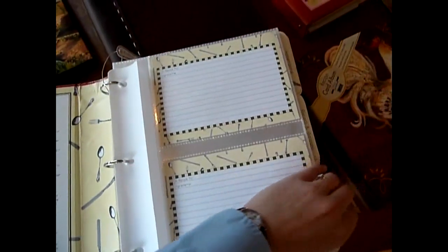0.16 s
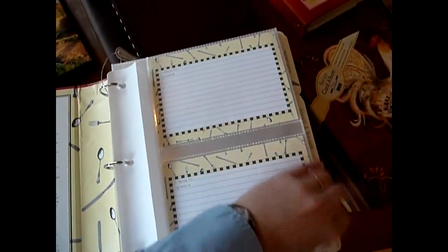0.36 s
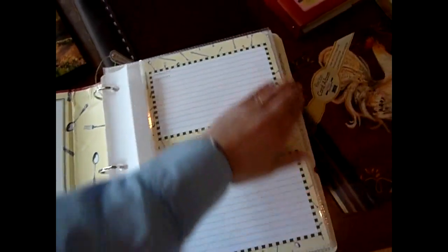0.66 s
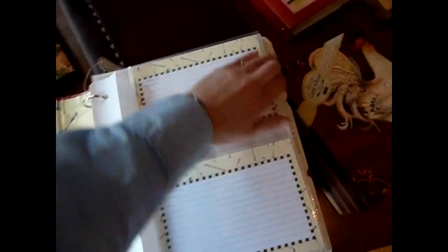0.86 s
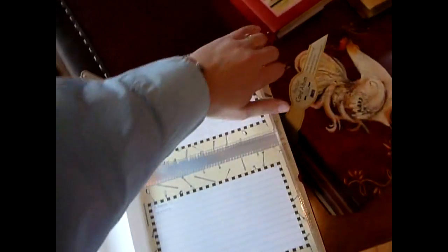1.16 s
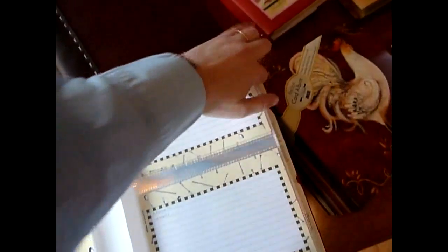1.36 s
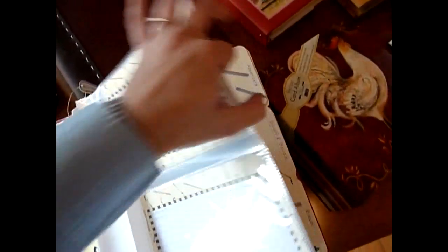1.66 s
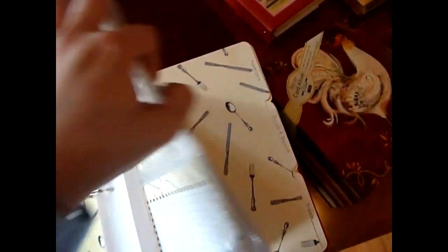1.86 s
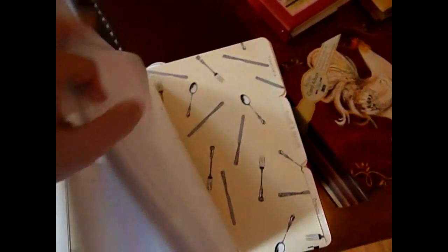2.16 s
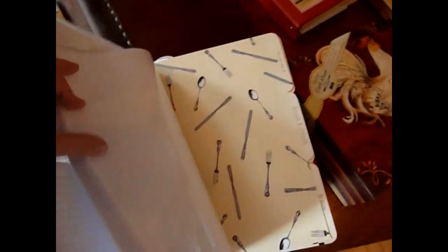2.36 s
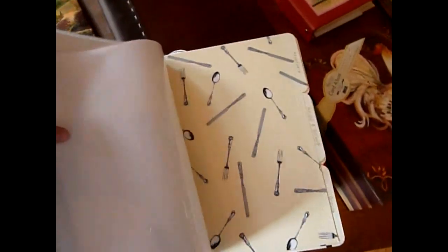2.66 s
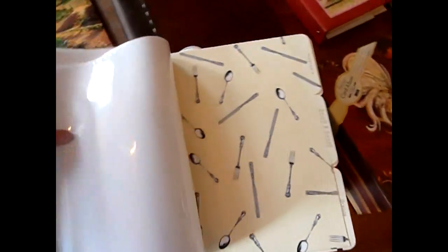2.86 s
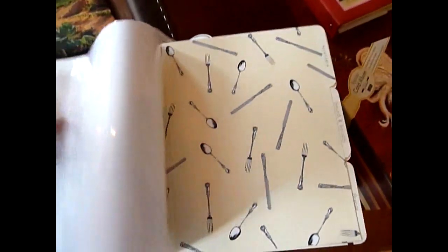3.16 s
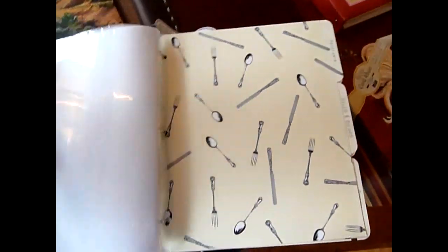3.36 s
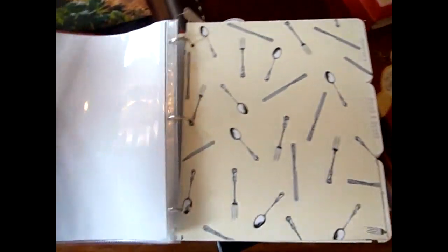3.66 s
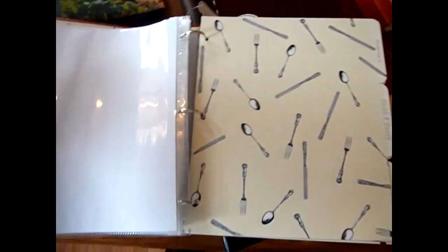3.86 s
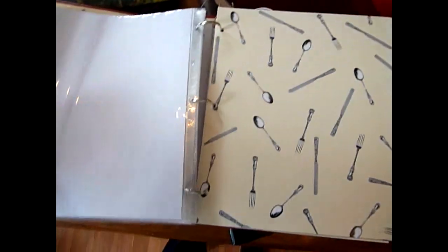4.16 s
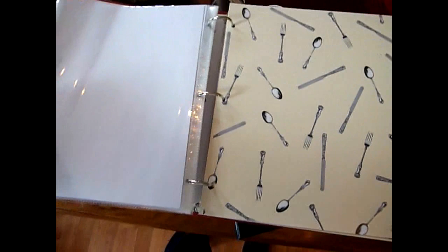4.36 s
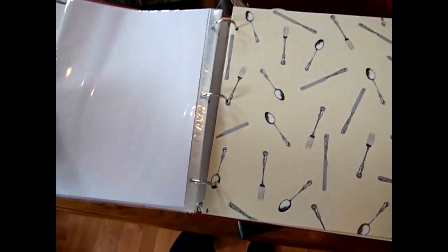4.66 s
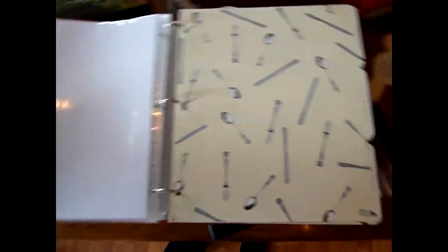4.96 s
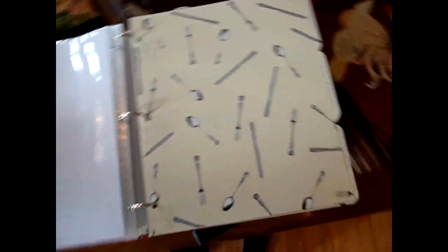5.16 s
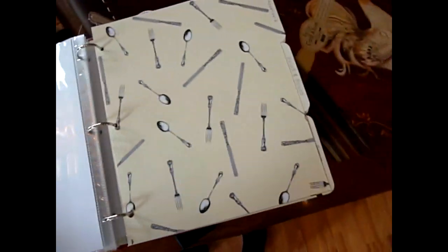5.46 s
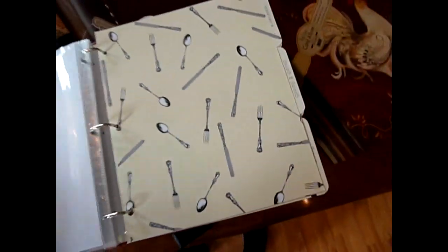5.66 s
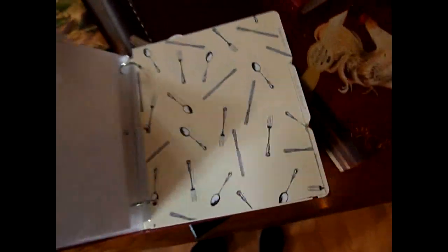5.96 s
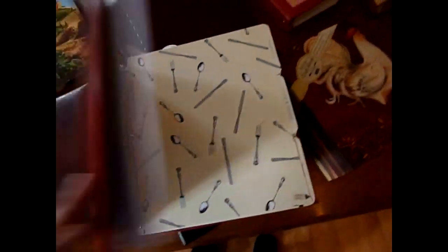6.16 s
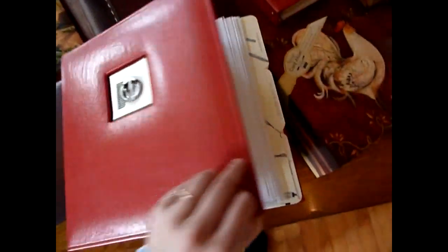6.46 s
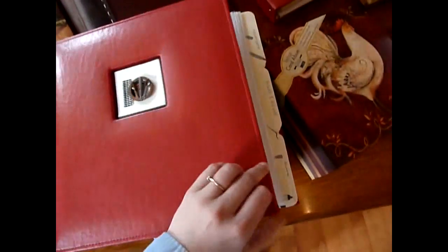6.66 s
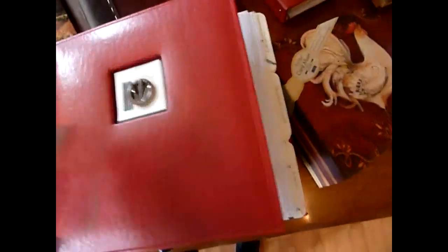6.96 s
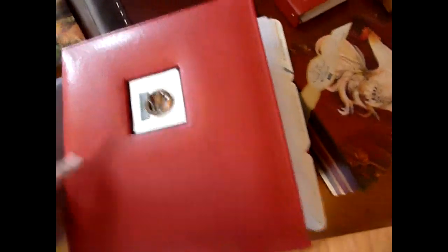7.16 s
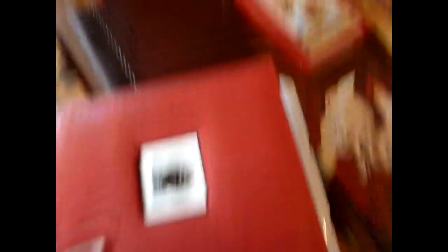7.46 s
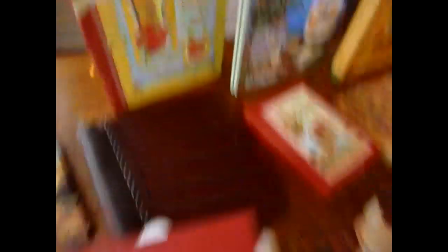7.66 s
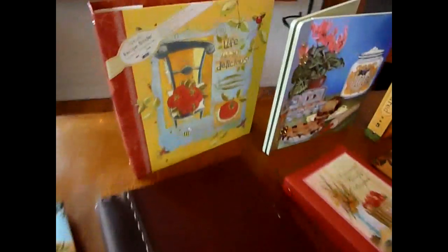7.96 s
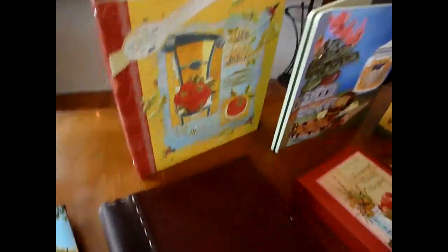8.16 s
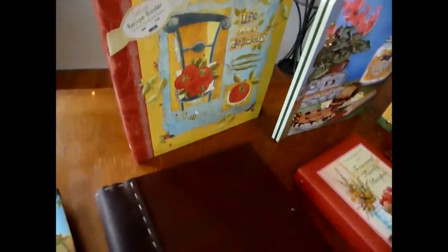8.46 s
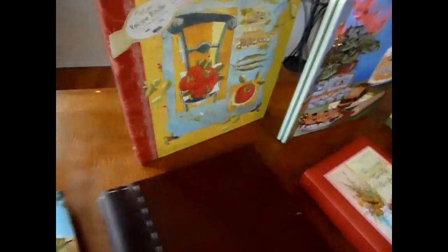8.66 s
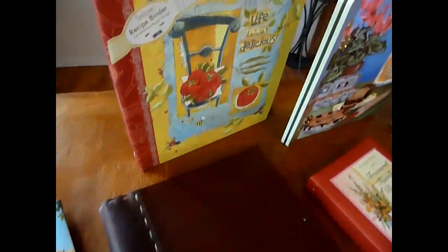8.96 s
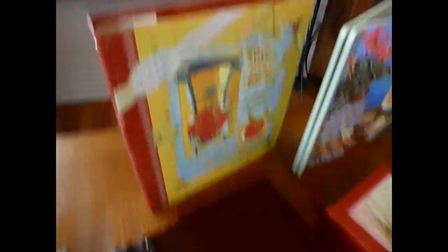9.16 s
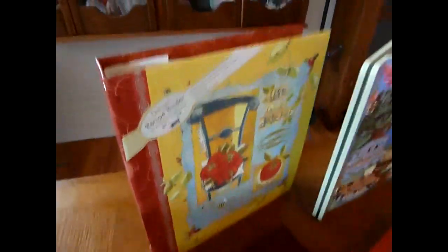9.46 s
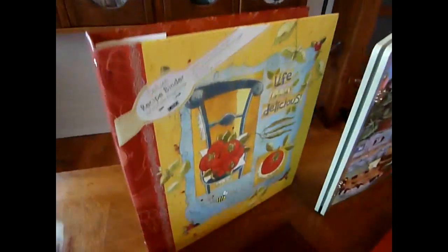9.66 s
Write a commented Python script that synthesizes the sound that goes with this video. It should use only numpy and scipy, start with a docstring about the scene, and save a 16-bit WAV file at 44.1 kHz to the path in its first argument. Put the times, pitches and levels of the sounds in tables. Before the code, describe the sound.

Close to the microphone in a small quiet room, plastic page protectors slide and crinkle faintly, with dry little clicks. Flops and knocks grow stronger as pages turn over, then comes a quieter pause. A sharp snap precedes the padded cover thudding shut and a hand stroking it. Damped bumps, short rubs and one fast brush on the wooden table follow, fading into soft room hush.

```python
"""Leafing through a binder of plastic sleeves

A ring binder of page protectors on a wooden table, one microphone close by, in a small room.
Sleeves slide, crinkle and flop: coloured friction noise, with clicks where the plastic buckles.
The padded cover is swung shut and stroked, then things are bumped and brushed about the table:
damped thuds, booms and cracks, a few ringing modes, and rubbing noise that drums at a moving pitch.
Diffuse reflections and a soft rush of still air lie behind it all."""
import sys
import numpy as np
from scipy import signal
from scipy.fft import rfft, irfft, next_fast_len
from scipy.io import wavfile

SR = 44100
rng = np.random.default_rng(int(sys.argv[2]) if len(sys.argv) > 2 else 0)


def master(y):
    """Save y as 16-bit WAV."""
    cut = np.clip(np.atleast_2d(y).T, -1, 1)
    pcm = np.round(cut * 32767)  # scale
    wavfile.write(sys.argv[1], SR, pcm.astype(np.int16))


N = 432621
TIME = np.arange(N) / SR   # s
HIT_TIME = np.arange(SR // 16) / SR   # s
CUTOFF_HZ = 7500

# A sleeve is pushed or dragged over its neighbour:
# start_s, length_s, level_db (of the crinkle), brightness_db
SLIDES = [(0.245, 0.063, -63.5, 5), (0.458, 0.015, -54.5, 1.5), (0.52, 0.16, -65, -2),
          (0.635, 0.019, -58, 2), (0.665, 0.17, -59.5, -1), (1.19, 0.21, -61.5, 5), (1.49, .14, -64.5, -2),
          (1.68, 0.098, -62, -3), (1.84, 0.056, -60.5, -1), (2.025, 0.051, -58, -3),
          (2.125, 0.078, -57.5, 2.5), (2.245, 0.062, -51, 2), (2.47, 0.29, -57.5, 0),
          (2.655, 0.064, -47, -2), (2.755, 0.058, -46, -8), (2.82, 0.09, -53.5, -10), (2.9, .035, -43, 1),
          (3.125, 0.046, -53.5, -3), (3.23, 0.1, -57, -1.5), (3.335, .18, -46.5, 0),
          (3.735, 0.089, -55.5, -7.5), (4.128, 0.017, -55, -4.5), (4.3, 0.075, -66.5, -1),
          (4.84, 0.077, -70, 1), (5.15, 1, -72.5, -1), (5.87, 0.16, -58, -4.5), (6.17, 0.054, -60, -3),
          (6.278, 0.042, -43.5, -4), (6.37, 0.14, -58.5, -2)]
SLIDE_SWELL, SLIDE_T60 = 0.24, 0.34   # share of the length spent swelling; dying away, s
# A sleeve drops and settles: start_s, level_db (of the crinkle), brightness_db
FLOPS = [(2.93, -33, -1.5), (3.565, -43, -6.5), (4.24, -62.5, 11), (5.07, -57.5, -6.5), (6.062, -46.5, 1),
         (6.322, -53, 7)]
FLOP_LENGTH_S, FLOP_SWELL, FLOP_T60 = 0.0089, 0.75, 0.41   # s, share of the length, s
FLEX_DB, SLEEVE_HISS_DB = -5.5, -4.5   # beside the crinkle, at brightness 0
# Colours of the bending sheet, its crinkle and its hiss: pitch_hz, density_db (per Hz, relative)
FLEX_COLOUR = [(100, -13.5), (190, -7.5), (255, -1.5), (400, 7), (550, 5.5), (680, 3.5), (810, 3),
               (1100, -23.5), (1800, -37)]
CRINKLE_COLOUR = [(600, -4.5), (900, 1.5), (1130, 4.5), (1400, 3.5), (1850, 2.5), (2250, 0.5), (2700, -2),
                  (3400, -11.5), (4200, -28)]
SLEEVE_HISS_COLOUR = [(2200, -18), (3300, 2.5), (4300, 0.5), (5300, -0.5), (6500, -6.5), (7500, -20.5)]

# Plastic buckles or catches on the rings: start_s, level_db (of the click), centre_hz
SNAPS = [(0.4768, -52, 2300), (1.0268, -48.5, 3360), (1.297, -57, 4000), (1.343, -50, 2500),
         (1.4782, -50.5, 2860), (1.49, -52.5, 1500), (1.8593, -52, 2250), (1.8768, -45, 2900),
         (2.0327, -50.5, 3000), (2.064, -45.5, 2700), (2.1877, -44.5, 3320), (2.2491, -40, 3450),
         (2.2597, -49, 2240), (2.3268, -43, 1990), (2.5528, -43, 3600), (2.6328, -34, 1940),
         (2.698, -45, 1460), (2.8586, -45, 1690), (2.8981, -35, 2390), (3.1765, -45.5, 1960),
         (3.2288, -42, 1970), (3.256, -46, 2250), (4.1914, -45, 3430), (4.235, -45, 3570),
         (4.2399, -37, 3150), (4.312, -53, 2340), (4.358, -55, 3500), (4.436, -54, 2350),
         (4.539, -60, 2700), (4.8506, -52.5, 2410), (4.904, -54, 2400), (5.0686, -37.5, 1900),
         (6.0608, -25.5, 2230), (6.2086, -49, 1710), (6.2465, -43, 1610), (6.2761, -40, 1900),
         (6.2856, -35.5, 1950), (6.3244, -30, 2900), (7.506, -42, 1720), (7.684, -46.5, 3000),
         (7.726, -32, 1660), (7.8252, -39, 1600), (8.0026, -51, 4800), (9.0299, -37, 1840),
         (9.708, -52, 1380), (9.756, -52, 1730)]
SNAP_TOP_HZ = 5200   # highest upper band edge of any click

# Fingers cross the top page: time_s, level_db
GLIDE = [(.7, -74), (.88, -56.5), (1.1, -61.5), (1.18, -69)]
# Colour of the fingertips' hiss: pitch_hz, density_db (per Hz, relative)
GLIDE_COLOUR = [(3000, -5.5), (4200, 0.5), (5200, 2.5), (6500, -4.5), (7500, -15.5)]

# Pages, cover and books land on the table:
# start_s, thud_hz, thud_db, then boom_db, clack_db and crack_db, all three beside the thud
KNOCKS = [(2.6742, 410, -38, -9, 0.5, -15), (2.784, 275, -30, -15.5, -8, -17),
          (2.924, 546, -21, -21, -20, -4), (2.9268, 444, -30, -15.5, -2, -14),
          (2.9453, 560, -29.5, -26, -20, -0.5), (3.2373, 360, -31, -13, -21, -26),
          (3.5529, 600, -27.5, -19, -2, -7), (3.5635, 746, -19.5, -26, -5, -11.5),
          (3.569, 407, -24, -30, -6, -5.5), (3.576, 463, -31.5, -26, -17, -6),
          (3.801, 600, -44, -21, -1, -10), (3.8236, 603, -47, -13, 3, -13),
          (4.1328, 430, -42, -21, -1.5, -19), (6.315, 686, -31.5, -22.5, -8, -11),
          (6.403, 600, -43, -20, -16, -23), (6.4766, 395, -22.5, -23, -11.5, -13),
          (6.5095, 604, -32.5, -19, -14, -25), (7.411, 710, -35.5, -15, -16, -23),
          (7.7418, 414, -19, -13, -9.5, -21), (7.752, 487, -26, -9, -12, -12.5),
          (7.8203, 650, -27, -9, -14, -21), (7.9709, 423, -35, -30, -26, -24),
          (8.1999, 507, -29.5, -9.5, -20, -26), (8.2479, 723, -27, -24, -14, -25),
          (8.3894, 530, -18.5, -19.5, -13, -22), (8.3924, 422, -23, -29, -17, -23),
          (8.455, 460, -31.5, -17, -3.5, -22), (8.8027, 650, -41.5, -4.5, 2, -8.5),
          (8.8885, 420, -26.5, -15.5, -6, -19.5), (8.892, 448, -29.5, -17.5, -8, -30)]
# Boards and binder rings sound on after a blow: start_s, pitch_hz, starting_level_db, t60_s
RINGS = [(2.947, 808, -36, 0.37), (3.576, 404, -31, 0.18), (3.576, 682, -39, 0.32), (4.145, 400, -38, 0.18),
         (4.241, 4140, -53, 0.25), (8.397, 396, -23.5, 0.054)]

# A hand or cuff rubs briefly over a cover or the table:
# start_s, length_s, level_db (of the scrape), brightness_db, drumming_hz
RUBS = [(6.965, 0.077, -43.5, 5, 990), (7.09, 0.094, -65, 4, 800), (7.215, 0.11, -61.5, 4, 400),
        (7.337, 0.019, -53.5, -6, 636), (7.402, 0.014, -52, -3.5, 710), (7.468, 0.041, -53, -3, 640),
        (7.591, 0.043, -52, -4.5, 555), (7.66, 0.055, -47.5, 2, 470), (7.711, 0.054, -43, 0, 750),
        (7.79, 0.062, -46, -2, 680), (7.893, .045, -48, 0, 740), (7.984, 0.058, -53, -1, 480),
        (8.046, 0.14, -57, -7.5, 790), (8.128, 0.089, -49.5, -2, 900), (8.228, 0.039, -45, -1, 900),
        (8.292, 0.049, -54.5, -1, 630), (8.375, 0.052, -46, -1, 500), (8.454, 0.17, -48.5, -7, 1000),
        (8.666, 0.08, -57, 0.5, 920), (8.777, 0.069, -51.5, 0, 676), (8.874, 0.054, -49, -4.5, 820),
        (8.945, .1, -52.5, 0, 690), (9.12, 0.16, -59, 0, 446), (9.298, 0.4, -68.5, -3.5, 496),
        (9.704, 0.091, -61, 1, 553)]
RUB_SWELL, RUB_T60 = 0.37, .2   # share of the length spent swelling; dying away, s
DRUM_DB, RUB_HISS_DB = 2.5, -9.5   # beside the scrape, at brightness 0
# One long stroke over the closed cover, both levels before the trims below:
# time_s, drumming_db, scrape_db, drumming_hz
STROKE = [(6.49, -35, -46, 570), (6.554, -43.5, -55, 641), (6.61, -36.5, -45.5, 765),
          (6.658, -38, -44, 715), (6.686, -38, -43, 870), (6.848, -40, -42, 584), (6.918, -46.5, -42, 772),
          (6.96, -55, -51, 788)]
# Trims of the stroke; its hiss follows the untrimmed scrape
STROKE_DRUM_DB, STROKE_SCRAPE_DB, STROKE_HISS_DB = -1, -3.5, -12
# Colours of scraping and hissing under the hand: pitch_hz, density_db (per Hz, relative)
SCRAPE_COLOUR = [(600, -2), (1000, 3.5), (1300, 3), (1800, 1), (2350, 0), (2900, -3.5), (4200, -33)]
RUB_HISS_COLOUR = [(2200, -14.5), (3300, 8.5), (4000, 7), (5200, 0), (6500, -8.5), (7500, -24.5)]

# A quick brush over a cover: time_s, level_db
SWISH = [(8.5, -62), (8.545, -32), (8.6, -29), (8.64, -38), (8.71, -52)]
# Colour of the brush: pitch_hz, density_db (per Hz, relative)
SWISH_COLOUR = [(400, -3.5), (800, -7), (1000, -11), (1310, 1), (1800, -5.5), (2400, 0.5), (2850, -8.5),
                (3500, -8), (4700, -16.5), (6300, -25.5), (7500, -39)]

# Colour of the room's reflections: pitch_hz, level_db
ROOM_COLOUR = [(90, -11), (250, 5), (500, -3.5), (1000, -8.5), (2500, -0.5), (6000, -6.5)]
# Colour of the still room: pitch_hz, density_db (per Hz, relative)
AIR_COLOUR = [(25, -25), (50, -10), (80, -5.5), (135, 0.5), (190, 0.5), (330, 0.5), (450, -3.5), (650, -4),
              (1000, -9.5), (2000, -15.5), (3200, -18.5), (5000, -24), (6500, -30.5), (7500, -42)]
AIR_DB = -53.5


def pages():
    """As sleeves slide and flop, the same slips make the sheet flex, crinkle and hiss."""
    drops = [(s, FLOP_LENGTH_S, db, bright_db) for s, db, bright_db in FLOPS]
    sliding = gestures(SLIDES, SLIDE_SWELL, SLIDE_T60)
    flopping = gestures(drops, FLOP_SWELL, FLOP_T60)
    flex, crinkle, hiss = np.hypot(sliding, flopping)
    slips = friction(slips_per_s=650, spread_db=4.5, smooth=1.0, clump_db=2.5)
    flexing = from_db(FLEX_DB) * flex * coloured(slips, FLEX_COLOUR)
    crinkling = crinkle * coloured(slips, CRINKLE_COLOUR)
    hissing = from_db(SLEEVE_HISS_DB) * hiss * coloured(slips, SLEEVE_HISS_COLOUR)
    return flexing + crinkling + hissing


def snaps(width=2.18, chatter=0.36, t60=0.012, sheet_db=-8, board_db=-17, stiff_db=9, top=1.57):
    """A crease flips over: a dry click in one broad band, a softer flap of the sheet, a tap on the board."""
    out = np.zeros(N)
    for s, db, hz in SNAPS:
        push = contact(chatter, t60)
        resonance = band(push, hz / width, hz * width, order=1)
        click = band(resonance, hz / 3, min(hz * top, SNAP_TOP_HZ))
        add(out, s, at_level(click, db))
        # small, high creases move little of the sheet: stiff_db less per octave
        moved_db = db - stiff_db * np.log2(hz / 2000)
        add(out, s, at_level(band(push, 580, 1300), moved_db + sheet_db))
        add(out, s, at_level(band(push, 290, 680), moved_db + board_db))
    return out


def glide():
    """Fingertips skim the smooth plastic with a thin, airy hiss of very dense slips."""
    level, = gains(GLIDE)
    slips = friction(slips_per_s=13000, spread_db=5.5, smooth=1.4, clump_db=1.4)
    return level * coloured(slips, GLIDE_COLOUR)


def knocks(thud_t60=0.017, scatter=0.41):
    """A heavily damped board thuds, the table booms under it, hard edges clack and crack."""
    out, thuds = np.zeros(N), np.zeros(N)
    for s, hz, thud_db, boom_db, clack_db, crack_db in KNOCKS:
        board = np.sin(2 * np.pi * hz * HIT_TIME) * from_db(-60 * HIT_TIME / thud_t60)
        other_modes = band(contact(chatter=0.079, t60=0.097), 280, 850)
        thud = at_level(board, 0) + scatter * at_level(other_modes, 0)
        push = contact(chatter=0.17, t60=0.018)
        boom = band(contact(chatter=0.13, t60=0.12), 118, 197, order=3)
        add(thuds, s, at_level(thud, thud_db))
        add(out, s, at_level(boom, thud_db + boom_db))
        add(out, s, at_level(band(push, 1030, 1740, order=3), thud_db + clack_db))
        add(out, s, at_level(band(push, 1600, 4200, order=3), thud_db + crack_db))
    # a small board radiates little bass
    return out + band(thuds, 225, 1900)


def cover_puff(s=6.4765, level_db=-27, low_hz=65, high_hz=330):
    """The closing cover squeezes out one low push of air."""
    out = np.zeros(N)
    puff = band(contact(chatter=0.031, t60=0.012), low_hz, high_hz)
    add(out, s, at_level(puff, level_db))
    return out


def ringing():
    """Some blows leave modes sounding a little longer, each a decaying sine."""
    out, t = np.zeros(N), TIME[:SR // 2]
    for s, hz, db, t60 in RINGS:
        add(out, s, from_db(db - 60 * t / t60) * np.sin(2 * np.pi * hz * t))
    return out


def rubbing():
    """Skin and cloth catch and slip in one long stroke and many short rubs; the surface drums under them."""
    drum, scrape, hiss = gestures([row[:4] for row in RUBS], RUB_SWELL, RUB_T60)
    stroke_drum, stroke_scrape = gains([row[:3] for row in STROKE])
    drum = from_db(DRUM_DB) * drum + from_db(STROKE_DRUM_DB) * stroke_drum
    scrape = scrape + from_db(STROKE_SCRAPE_DB) * stroke_scrape
    hiss = from_db(RUB_HISS_DB) * hiss + from_db(STROKE_HISS_DB) * stroke_scrape
    # the drumming pitch moves through the stroke, then through the middle of each rub
    stroke_pitch = [(s, hz) for s, *_, hz in STROKE]
    rub_pitch = [(s + length / 2, hz) for s, length, *_, hz in RUBS]
    centre_hz = np.interp(TIME, *np.transpose(stroke_pitch + rub_pitch))
    slips = friction(slips_per_s=1600, spread_db=2.0, smooth=1.0, clump_db=1.55)
    drumming = drum * gliding_band(slips, centre_hz, octaves=1.0)
    scraping = scrape * coloured(slips, SCRAPE_COLOUR)
    return drumming + scraping + hiss * coloured(slips, RUB_HISS_COLOUR)


def swish():
    """One fast brush over a cover: sliding noise with a few stronger catches in it."""
    level, = gains(SWISH)
    slips = friction(slips_per_s=1900, spread_db=11.5, smooth=3.9, clump_db=-3.6)
    return level * coloured(slips, SWISH_COLOUR)


def room(x, t60, build_s=0.0037, treble_t60=0.51):
    """Diffuse reflections build up within milliseconds; each octave dies away at its own rate."""
    t, response = TIME[:SR // 2], 0
    for hz in 90 * 2. ** np.arange(7):
        noise = band(rng.standard_normal(len(t)), hz / np.sqrt(2), hz * np.sqrt(2))
        decay_s = np.interp(hz, [0, CUTOFF_HZ], [t60, treble_t60])
        tail = noise * from_db(-60 * t / decay_s) * (1 - np.exp(-(t / build_s) ** 2))
        # before its colour, each octave returns what it received
        share = np.sqrt(np.sqrt(2) * hz / SR / np.sum(tail ** 2))
        response = response + tail * share * from_db(at_hz(ROOM_COLOUR, hz))
    return signal.fftconvolve(x, response)[:N]


def still_air():
    """The room's own soft rush: steady noise, strongest in the lows."""
    return from_db(AIR_DB) * coloured(rng.standard_normal(N), AIR_COLOUR)


def friction(slips_per_s, spread_db, smooth, clump_db):
    """Tiny slips of uneven size over a smooth sliding noise, all swelling and thinning in clumps."""
    sizes = from_db(spread_db * np.minimum(rng.exponential(1, N), 4)) * rng.choice([-1, 1], N)
    slips = rms_one(sizes * (rng.random(N) < slips_per_s / SR))
    return (slips + smooth * rng.standard_normal(N)) * from_db(clump_db * drift(70))


def gestures(moves, swell, release_t60):
    """Each move swells, holds and dies away; brightness trades lows for highs. Gains of lows, mids, highs."""
    power, t = np.zeros((3, N)), TIME[:SR]
    for s, length, db, bright_db in moves:
        attack = np.minimum(t / (swell * length), 1)
        shape = attack * from_db(db - 60 * np.maximum(t - length, 0) / release_t60)
        for track, tilt_db in zip(power, (-bright_db, 0, bright_db)):
            add(track, s, (shape * from_db(tilt_db)) ** 2)
    return np.sqrt(power)


def contact(chatter, t60):
    """One sharp push, then a few milliseconds of surfaces chattering."""
    push = chatter * rng.standard_normal(len(HIT_TIME)) * from_db(-60 * HIT_TIME / t60)
    push[0] += 1
    return push


def gliding_band(x, centre_hz, octaves):
    """Noise gathered around a moving centre: third-octave bands faded in and out; power 1."""
    out = power = 0
    for hz in 200 * 2 ** (np.arange(10) / 3):
        weight = np.exp(-(np.log2(hz / centre_hz) / octaves) ** 2) + 1e-6
        shifted = np.roll(x, rng.integers(N))   # keeps the bands independent
        third = band(shifted, hz / 2 ** (1 / 6), hz * 2 ** (1 / 6))
        out = out + weight * rms_one(third)
        power = power + weight ** 2
    return out / np.sqrt(power)


def coloured(x, spectrum):
    """Give x a spectrum that falls away beyond its ends; rms 1."""
    size = next_fast_len(N)
    hz = np.arange(size // 2 + 1) * SR / size
    (low_hz, low_db), (high_hz, high_db) = spectrum[0], spectrum[-1]
    closed = [(low_hz / 2, low_db - 20), *spectrum, (high_hz * 2, high_db - 20)]
    return rms_one(irfft(rfft(x, size) * from_db(at_hz(closed, hz)), size)[:N])


def band(x, low_hz, high_hz, order=2):
    """Causal band-pass."""
    return signal.sosfilt(signal.butter(order, [low_hz, high_hz], "band", fs=SR, output="sos"), x)


def gains(rows):
    """The dB columns of a curve as gains at every sample, 120 dB down outside its span."""
    s, *columns = np.transpose(rows)
    return [from_db(np.interp(TIME, s, c, left=-120, right=-120)) for c in columns]


def drift(rate):
    """Slow chance: random points, rate of them a second, joined by straight lines."""
    knots = rng.standard_normal(N // 16)
    return np.interp(TIME * rate, np.arange(len(knots)), knots)


def at_hz(points, hz):
    """Read a table on a log-frequency axis."""
    f, value = np.transpose(points)
    return np.interp(np.log(hz + 1e-9), np.log(f), value)


def at_level(hit, db):
    """Scale a hit to the energy of 5 ms at this rms level."""
    return hit * from_db(db) * np.sqrt(.005 * SR / (np.sum(hit ** 2) + 1e-20))


def add(track, s, sound):
    """Mix a sound into the track at time s."""
    i = round(s * SR)
    track[i:i + len(sound)] += sound[:N - i]


def rms_one(x):
    """Scale to unit rms."""
    return x / np.sqrt(np.mean(x ** 2) + 1e-20)


def from_db(db):
    """Decibels to gain."""
    return 10 ** (np.asarray(db) / 20)


def scene():
    """Everything happens on the table; the room answers over its own soft rush."""
    rustle = pages() + glide() + rubbing() + swish()
    blows, clicks = knocks() + cover_puff(), snaps()
    to_room = from_db(-4.0) * rustle + from_db(-8.5) * blows + from_db(-6) * clicks
    reflections = room(to_room, t60=0.22)
    return (rustle + blows + clicks + ringing() + reflections + still_air())[None]


def record(dry):
    """The microphone softens the treble and the recorder cuts the top steeply."""
    soft = signal.sosfilt(signal.butter(6, 7000, fs=SR, output="sos"), dry)
    return signal.sosfilt(signal.ellip(10, .3, 70, CUTOFF_HZ, fs=SR, output="sos"), soft)


dry = scene()
out = record(dry)
master(out)
```